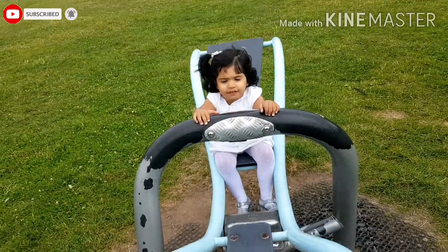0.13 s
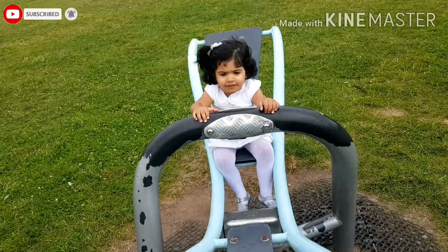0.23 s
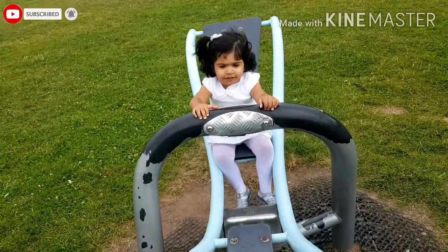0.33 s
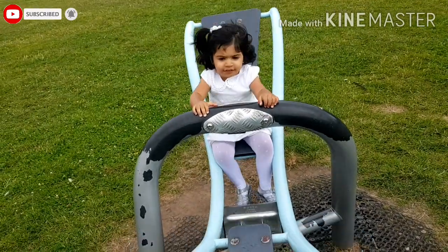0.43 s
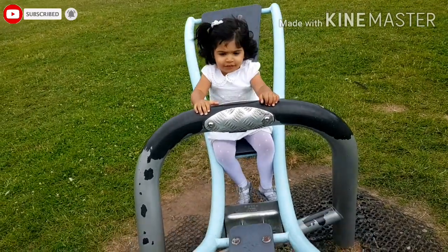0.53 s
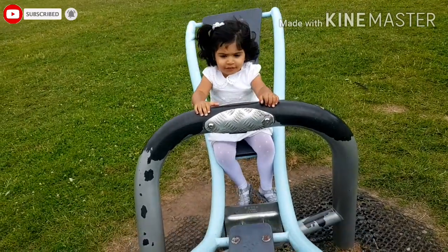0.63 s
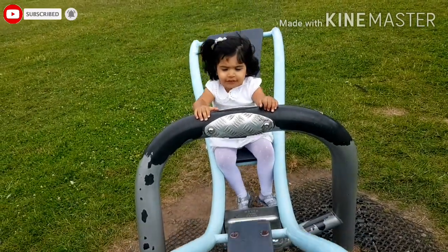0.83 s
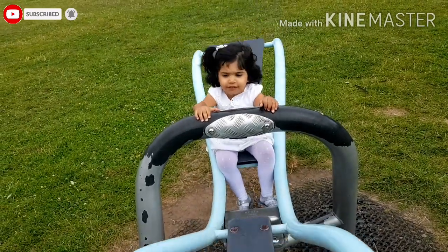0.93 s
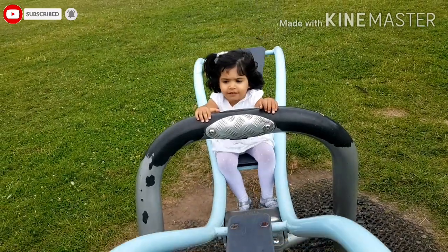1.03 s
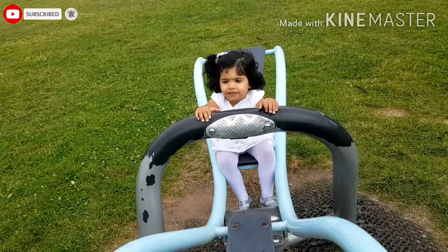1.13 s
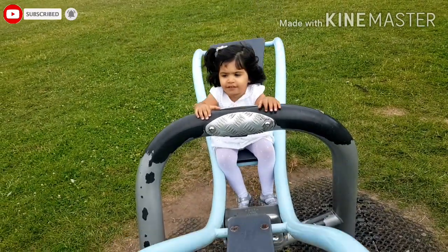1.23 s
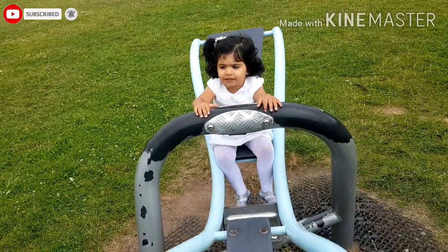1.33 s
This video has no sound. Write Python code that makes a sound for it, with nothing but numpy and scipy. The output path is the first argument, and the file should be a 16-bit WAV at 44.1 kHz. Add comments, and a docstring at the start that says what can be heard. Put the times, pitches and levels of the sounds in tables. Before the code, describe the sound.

A metal rocking seat creaks, grinds and squeals twice, about half a second apart, and a third creak just begins. The seat bumps softly before and after, outdoors on a quiet lawn with faint wind rumbling on the microphone.

```python
"""A steel playground rocker swings to and fro on a lawn. First its seat bumps softly, over light wind and
a rustle. Then the dry pivot catches with a rough creak, rasps as it sticks and slips against the frame,
and locks into a pure squeal that sets two tube notes ringing. Half a second later the swing back creaks,
rasps and squeals again. The seat bumps twice more, and a third creak is just starting at the end."""
import sys
import numpy as np
from scipy import signal
from scipy.fft import rfft, irfft
from scipy.io import wavfile

SR = 44100
rng = np.random.default_rng(int(sys.argv[2]) if len(sys.argv) > 2 else 0)


def materialize(psi):
    """Save the field psi as 16-bit PCM at rate SR to the path in sys.argv[1].

    A 1-D psi becomes a single channel; in a 2-D psi each row is a channel.
    """
    bounded = np.clip(np.atleast_2d(psi).T, -1, 1)
    quanta = np.round(bounded * 32767).astype(np.int16)
    wavfile.write(sys.argv[1], SR, quanta)


N = 61740  # 1.4 s


# path of each squeal: t/s, f/Hz, level/dB
SQUEAL_CURVES = [
    [(.396, 3950, -41), (.405, 4002, -31), (.423, 4074, -28.5), (.435, 4029, -30), (.447, 3973, -31.5),
     (.463, 4015, -40.5), (.488, 4060, -67)],
    [(.928, 4090, -54.5), (.938, 4070, -35.5), (.955, 4100, -30.5), (.965, 4068, -33.5),
     (.973, 4174, -52.5)],
]
# character of each squeal: roughness/0-1, left over right/dB, left phase lead/rad, tube ring/dB,
# side tones/dB, 2nd harmonic/dB, 3rd harmonic/dB
SQUEAL_CHARACTER = [(0.05, 3.5, -1.24, -25.5, -32.5, -29.5, -29), (0, 1.5, -1.61, -11.5, -15.5, -23.5, -19)]
# notes of the tubes: f/Hz, level/dB, time to fade 60 dB/s, then level/dB for each of the five side_tones
TUBE_NOTES = [(1399, -3.5, 0.08, -2, -9.5, -23, -17.5, -14.5), (1763, -1, 0.12, -3, 5, -7.5, -6, -10)]
def squeal(curve, character, jitter=0.015, waver_hz=170, flutter=0.75, build_s=0.011):
    """The pivot sings one note; the tubes ring along and beat against it, adding side tones."""
    rough, pan_db, lead, ring_db, side_db, second_db, third_db = character
    at, pitch_hz, _ = np.array(curve).T
    t = times()
    tone = spin(np.interp(t, at, pitch_hz) * (1 + jitter * rough * wander(waver_hz)))
    level = gain_curve(curve) * np.exp(flutter * rough * wander(waver_hz))
    voice = tone + undb(second_db) * tone ** 2 + undb(third_db) * tone ** 3
    lag = np.exp(-1 / (build_s * SR))
    rings = 0
    for hz, db, fade_s, *sides_db in TUBE_NOTES:
        tube = spin(hz * (1 + 0.007 * wander(47.7)))
        # multiplying two tones adds their pitches, dividing subtracts them
        side_tones = [tone / tube, tone * tube, tone ** 2 / tube, tone ** 2 * tube, tone ** 3 / tube]
        voice = voice + undb(side_db) * sum(gain * z for gain, z in zip(undb(sides_db), side_tones))
        # the tube follows the squeal up, but dies away at its own pace
        fall = np.log(1000) * t / fade_s
        held = np.exp(np.maximum.accumulate(np.log(level + 1e-12) + fall) - fall)
        rings = rings + undb(db) * tube * signal.lfilter([1 - lag], [1, -lag], held)
    return stereo(level * voice, pan_db, lead) + stereo(undb(ring_db) * rings, lead=-0.96)


# path of each creak's two notes: t/s, lower f/Hz, lower level/dB, upper f/Hz, upper level/dB, roughness/0-1
CREAK_CURVES = [
    [(.224, 2489, -53, 3848, -56, 0.48), (.242, 2483, -53.5, 3780, -39, 0.54),
     (.247, 2500, -50.5, 3845, -34, 0), (.264, 2399, -51, 3835, -32, 0.2),
     (.283, 2344, -50, 3885, -32, 0.31), (.302, 2380, -51.5, 3823, -27.5, 0.15),
     (.324, 2414, -53.5, 3771, -27.5, 0.01), (.329, 2400, -58, 3820, -33, .35),
     (.35, 2442, -53, 3820, -35.5, 0.42), (.368, 2366, -51.5, 3830, -40, 0.31),
     (.387, 2477, -43, 3846, -44, .1), (.402, 2375, -47.5, 3888, -39, 0.05)],
    [(.751, 2400, -58, 3846, -61, 0.22), (.762, 2374, -39.5, 3690, -78.5, 0.02),
     (.777, 2355, -44.5, 3690, -49.5, 0.2), (.79, 2494, -44.5, 3800, -64, 0.15),
     (.818, 2453, -47.5, 3836, -63, 0.49), (.834, 2334, -49.5, 3920, -46, 0.76),
     (.856, 2428, -68, 3850, -40, 0.71), (.876, 2454, -55, 3800, -76, 0.58),
     (.895, 2377, -42, 3707, -42.5, 0.11), (.92, 2419, -43, 3780, -48.5, 0),
     (.936, 2377, -44.5, 3850, -47, 0.31)],
    [(1.362, 2540, -59, 3753, -64, 0.23), (1.373, 2520, -48, 3730, -57.5, 0.31),
     (1.387, 2476, -54.5, 3727, -41.5, 0.13), (1.4, 2517, -47, 3700, -59.5, 0.6)],
]
# character of each creak: left over right/dB, left phase lead of the lower note/rad, of the upper/rad,
# difference tones/dB, sums and overtones/dB
CREAK_CHARACTER = [(-0.466, -0.5, 1.15, -3.5, -1.5), (0.54, -0.64, 0.19, -1, -2.5),
                   (1, -0.76, 0.41, -23.5, 3.5)]
# tones that rubbing makes of the two notes: multiple of the lower, multiple of the upper
CREAK_TONES = [(1, 0), (0, 1), (2, 0), (1, 1), (-1, 1), (2, -1), (3, 0), (4, 0), (1, 2), (0, 2), (0, 3)]
# strength of each of those tones: level/dB
CREAK_TONE_LEVELS = [-1, -3, -7.5, -10.5, -15.5, -14, -23.5, -27.5, -23, -29.5, -35]
def creak(curve, character, jitter=0.018, flutter=2.1, waver_hz=150):
    """Two wavering notes share one rubbing spot, which adds their sums and differences."""
    pan_db, lower_lead, upper_lead, difference_db, overtone_db = character
    at, *columns = np.array(curve).T
    lower_hz, lower_db, upper_hz, upper_db, rough = (np.interp(times(), at, col) for col in columns)
    contact = gain_curve([(at[0], 0), (at[-1], 0)], fade_s=0.0023)
    lower, upper = (spin(hz * (1 + jitter * rough * wander(waver_hz))) for hz in (lower_hz, upper_hz))
    out = 0
    for (m, n), tone_db in zip(CREAK_TONES, CREAK_TONE_LEVELS):
        parents_db = (abs(m) * lower_db + abs(n) * upper_db) / (abs(m) + abs(n))
        db = tone_db + parents_db + difference_db * (m * n < 0) + overtone_db * (m + n > 1)
        level = contact * undb(db) * (1 + flutter * rough * np.tanh(wander(waver_hz)))
        out = out + stereo(level * lower ** m * upper ** n, pan_db, m * lower_lead + n * upper_lead)
    return out


# strength of the grinding in each swing: t/s, level/dB
RASP_CURVES = [
    [(.22, -61.5), (.232, -55), (.255, -51.5), (.27, -43.5), (.29, -45.5), (.318, -47.5), (.34, -42.5),
     (.358, -42), (.385, -50.5), (.40, -48.5), (.46, -58.5), (.473, -51.5), (.49, -75)],
    [(.748, -65), (.775, -60), (.80, -48.5), (.83, -46), (.857, -49), (.88, -54.5), (.897, -46),
     (.91, -44.5), (.94, -50.5), (.968, -43), (.995, -77.5)],
    [(1.36, -64), (1.375, -62.5), (1.4, -56.5)],
]
def rasp(spread_db=-0.5):
    """The dry pivot grinds; the tubes spread its high tones to both sides."""
    force = sum(gain_curve(curve) for curve in RASP_CURVES)
    spread = colour(stick_slip(force), [(650, -10), (2600, 0)])
    return stick_slip(force) + undb(spread_db) * spread * np.array([[1], [-1]])


# notes of the steel frame: f/Hz, width/Hz, level/dB
FRAME_NOTES = [(858, 42, -9), (983, 240, -7), (1439, 40, 2), (1624, 66, -3.5), (2320, 150, -0.5),
               (2600, 52, 1.5), (2940, 80, -4), (3244, 42, -0.5), (3530, 81, 0), (3908, 120, 2.5),
               (4433, 70, 4), (4559, 91, 3.5), (4787, 70, 2), (5260, 70, -0.5), (5517, 130, -0.5),
               (6160, 210, -1), (6405, 52, -4.5), (7670, 48, -13.5), (9800, 200, -29), (12290, 55, -13.5)]
# tone of the bare scrape: f/Hz, level/dB
SCRAPE_COLOUR = [(400, -48), (800, -28.5), (2000, -38), (4000, -29.5), (6400, -21.5), (7000, -33.5),
                 (10000, -19.5), (15000, -38)]
def stick_slip(force, typical_hz=1813, jitter=0.5, scatter_db=3, drift_db=5, drift_hz=29):
    """Steel grabs and lets go in tiny, uneven jolts that ring the frame; more force brings more scrape."""
    chance = rng.standard_normal((N // 10, 2))
    gaps = np.exp(jitter * chance[:, 0])
    at = (np.cumsum(gaps) * SR / typical_hz).astype(int)
    jolts = np.bincount(at[at < N], undb(scatter_db * chance[at < N, 1]), N)
    jolts = jolts - jolts.mean()
    frame = 0
    for hz, width, db in FRAME_NOTES:
        ring = resonate(resonate(jolts, hz, width), hz, 5 * width)
        frame = frame + undb(db + drift_db * wander(drift_hz)) * ring
    scrape = colour(jolts, SCRAPE_COLOUR) + tube_walls(jolts)
    scrape_share = (force / force.max()) ** 0.4
    return force * (frame + scrape_share * scrape) / frame.std()


# tone of the ringing tube walls: f/Hz, level/dB
TUBE_WALL_COLOUR = [(6500, -6.5), (8500, -14), (9800, -2), (11500, -10), (13000, -14.5), (15000, -16)]
def tube_walls(jolts, count=30, width_hz=28, drift_db=4.5, drift_hz=29):
    """The tube walls ring with many high, unevenly spaced notes that come and go."""
    span_hz = [TUBE_WALL_COLOUR[0][0], TUBE_WALL_COLOUR[-1][0]]
    notes_hz = np.interp(np.arange(count) + rng.random(count), [0, count], span_hz)
    rings = sum(undb(drift_db * wander(drift_hz)) * resonate(jolts, hz, width_hz) for hz in notes_hz)
    return colour(rings, TUBE_WALL_COLOUR)


# notes that sing out briefly: t/s, length/s, f/Hz, level/dB (t is the middle of the note); most are frame
# notes, but the low one at 0.915 s strengthens a rubbing tone of the second creak
CHIRP_NOTES = [(0.245, .025, 4830, -48.5), (0.279, 0.038, 1590, -53.5), (0.292, 0.014, 5410, -40),
               (0.34, .04, 4400, -48.5), (0.354, 0.027, 5565, -47), (0.401, 0.055, 1390, -53.5),
               (0.817, 0.063, 835, -55.5), (0.808, 0.049, 5388, -47), (0.858, 0.021, 4070, -53),
               (0.864, 0.016, 4530, -45), (0.9, 0.02, 2597, -46.5), (.915, 0.035, 1078, -54),
               (0.921, 0.067, 4494, -46.5), (0.42, 0.044, 5440, -57), (0.64, .045, 4060, -78.5),
               (1.286, 0.025, 4130, -90)]
def chirp(at, length, hz, db, rough=0.41, waver_hz=170):
    """One note takes over for a moment, wavering as the pivot slips."""
    swell = np.cos(np.pi * np.clip((times() - at) / length, -.5, .5))
    flutter = unit(np.exp(rough * wander(waver_hz)))
    tone = spin(hz * (1 + 0.015 * rough * wander(waver_hz)))
    return stereo(undb(db) * swell * flutter * tone)


# small ticks: t/s, level/dB, decay/s
PIVOT_TICKS = [(0.339, -43, 0.0032), (0.47, -51.5, 0.0045), (0.55, -66.5, 0.006)]
# their bright tone: f/Hz, level/dB
PIVOT_TICK_COLOUR = [(800, -21.5), (2400, 3.5), (4400, -1), (6400, -13), (7500, -10), (15000, -11)]
def ticks():
    """The slightly loose pivot clicks as it shifts."""
    return knocks(PIVOT_TICKS, PIVOT_TICK_COLOUR)


# lingering notes of the frame: f/Hz, time to fade 60 dB/s, level/dB
LINGERING_NOTES = [(3970, 0.45, -34), (4090, 0.87, -30), (2350, 0.33, -14.5), (1810, .25, -22),
                   (5500, 0.25, -14), (6430, 0.45, -15), (7900, 0.22, -3), (12290, 0.17, -15.5)]
def echo_and_ring(sound, echo_db=-9.5, echo_fade_s=0.084):
    """Sound bounces off the ground and frame, and the frame rings on faintly."""
    fall = -np.log(1000) * times()
    echo = undb(echo_db) * unit(noise() * np.exp(fall / echo_fade_s)) / np.sqrt(N)
    out = signal.fftconvolve(sound, echo, axes=1)[:, :N]
    for hz, fade_s, db in LINGERING_NOTES:
        ring = resonate(noise(), hz, width_hz=60) * np.exp(fall / fade_s)
        ring = ring / np.abs(rfft(ring)).max()
        out = out + undb(db) * signal.fftconvolve(sound, ring, axes=1)[:, :N]
    return out


# soft bumps: t/s, level/dB, decay/s
SEAT_BUMPS = [(.003, -51, 0.0066), (.163, -54, 0.0076), (1.128, -62.5, 0.03), (1.338, -49, 0.00638)]
# their dull tone: f/Hz, level/dB
SEAT_BUMP_COLOUR = [(60, -8.5), (250, 4.5), (900, -3), (1300, -11), (2500, -27.5), (8000, -79)]
# rise and fall of the rustle: t/s, level/dB
RIDE_RUSTLE = [(0, -59), (.045, -58), (.08, -66), (.15, -69.5), (.18, -55), (.22, -68), (.33, -57.5),
               (.5, -62), (.59, -64), (.66, -86), (.85, -65), (1.05, -74.5), (1.135, -66.5), (1.22, -96.5),
               (1.3, -66.5), (1.34, -61), (1.4, -53)]
# its tone: f/Hz, level/dB
RIDE_RUSTLE_COLOUR = [(60, -15), (170, -3), (350, -1), (600, -10), (1000, -12.5), (1600, -30.5),
                      (4000, -37.5), (12000, -60.5)]
def seat():
    """The seat bumps and the ride rustles softly."""
    return knocks(SEAT_BUMPS, SEAT_BUMP_COLOUR) + gain_curve(RIDE_RUSTLE) * hiss(RIDE_RUSTLE_COLOUR)


# puffs of wind: t/s, level/dB
GUSTS = [(0, -65.5), (.125, -56), (.15, -81), (.18, -56.5), (.26, -62), (.308, -52), (.326, -53.5),
         (.36, -63), (.6, -58), (.69, -62), (.88, -59), (.99, -64), (1.036, -57.5), (1.13, -62.5),
         (1.22, -71), (1.4, -52)]
# their deep tone: f/Hz, level/dB
GUST_COLOUR = [(20, -16), (35, -11.5), (62, 1.5), (120, -2.5), (200, -7), (400, -28), (1200, -53)]
def wind(pan_db=3):
    """Light wind rumbles on the microphone, a little louder on the left."""
    return gain_curve(GUSTS) * hiss(GUST_COLOUR) * undb(pan_db * np.array([[.5], [-.5]]))


# tone of the quiet park: f/Hz, level/dB
HUSH_COLOUR = [(50, -10.5), (500, -0.5), (1500, -8.5), (3000, -19), (4100, -12.5), (6000, -19),
               (15000, -23)]
def park(level_db=-75):
    """A faint, steady hush lies under everything."""
    return undb(level_db) * hiss(HUSH_COLOUR)


def knocks(rows, points):
    """Quickly dying bursts of noise, with the tone of the struck part."""
    t = times()
    bursts = sum(undb(db) * (t > at) * np.exp(-np.abs(t - at) / decay) for at, db, decay in rows)
    raw = noise()
    return colour(raw * bursts, points) / colour(raw, points).std()


def noise():
    """White noise, different on the left and right."""
    return rng.standard_normal((2, N))


def hiss(points):
    """Noise with a given tone, at strength 1."""
    return unit(colour(noise(), points))


def undb(db):
    """Turn decibels into a gain."""
    return 10 ** (np.asarray(db) / 20)


def unit(x):
    """Scale to an average strength (rms) of 1."""
    return x / np.sqrt(np.mean(np.abs(x) ** 2))


def times():
    """Time of each sample in seconds."""
    return np.arange(N) / SR


def gain_curve(rows, fade_s=0.00081):
    """Join (t/s, ..., level/dB) rows into a gain that fades out beyond both ends."""
    at, *_, db = np.array(rows).T
    t = times()
    outside_s = np.maximum(np.maximum(at[0] - t, t - at[-1]), 0)
    return undb(np.interp(t, at, db)) * np.exp(-outside_s / fade_s)


def wander(rate_hz):
    """Smooth random motion of strength 1."""
    f = np.fft.rfftfreq(N, 1 / SR)
    return unit(irfft(rfft(rng.standard_normal(N)) / (1 + (f / rate_hz) ** 4), N))


def colour(x, points):
    """Shape a sound's tone along (f/Hz, level/dB) points."""
    hz, db = np.array(points).T
    f = np.fft.rfftfreq(N, 1 / SR)
    return irfft(rfft(x) * undb(np.interp(np.log(f + 1), np.log(hz), db)), N)


def resonate(x, hz, width_hz):
    """Let a sound ring at one pitch."""
    b, a = signal.iirpeak(hz, hz / width_hz, fs=SR)
    return signal.lfilter(b, a, x)


def spin(hz):
    """A pure tone that follows a pitch curve, as a point circling in the complex plane."""
    return np.exp(2j * np.pi * np.cumsum(hz) / SR)


def stereo(tone, pan_db=0, lead=0):
    """Split a complex tone in two: the left is pan_db louder and lead radians ahead."""
    side = np.array([[.5], [-.5]])
    return np.sqrt(2) * np.real(tone * undb(pan_db * side) * np.exp(1j * lead * side))


def scene():
    """The pivot and its echo, over wind, seat and the quiet park."""
    pivot = rasp() + sum(map(squeal, SQUEAL_CURVES, SQUEAL_CHARACTER)) + ticks()
    pivot += sum(map(creak, CREAK_CURVES, CREAK_CHARACTER))
    pivot += sum(chirp(*note) for note in CHIRP_NOTES)
    return pivot + wind() + seat() + echo_and_ring(pivot) + park()


def record(dry, top_hz=15500):
    """Cut away the very highest tones."""
    return signal.sosfilt(signal.ellip(10, .2, 80, top_hz, fs=SR, output="sos"), dry)


dry = scene()
out = record(dry)
materialize(out)
```